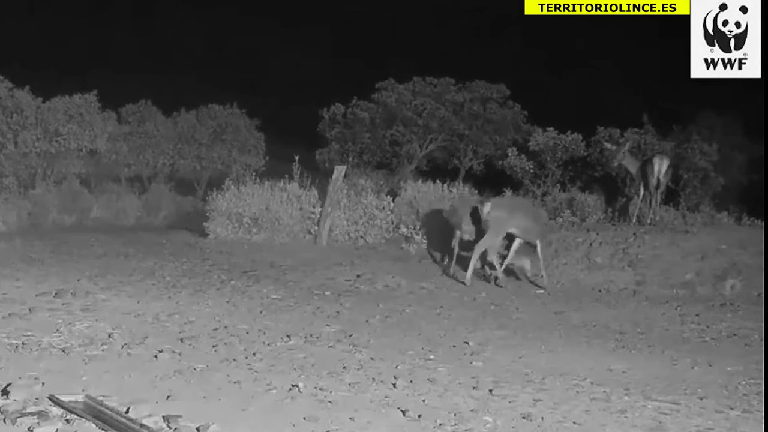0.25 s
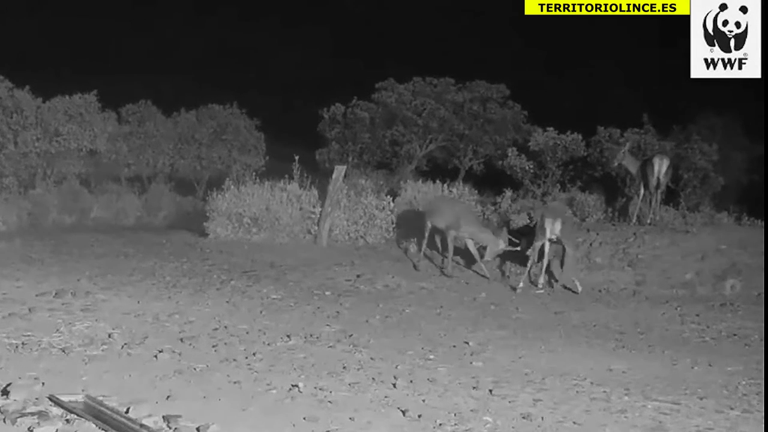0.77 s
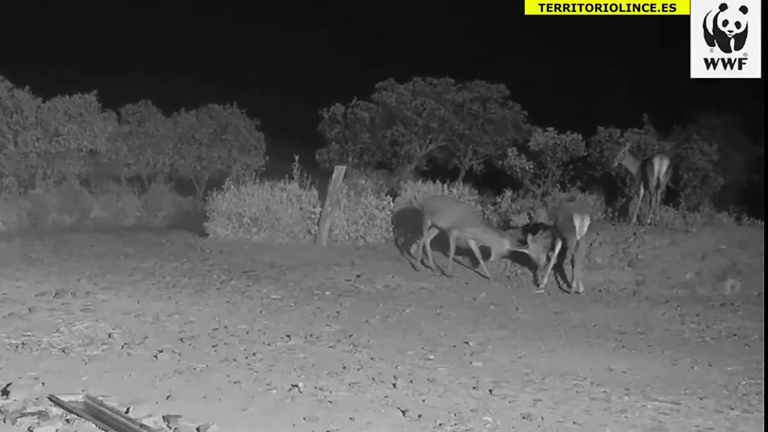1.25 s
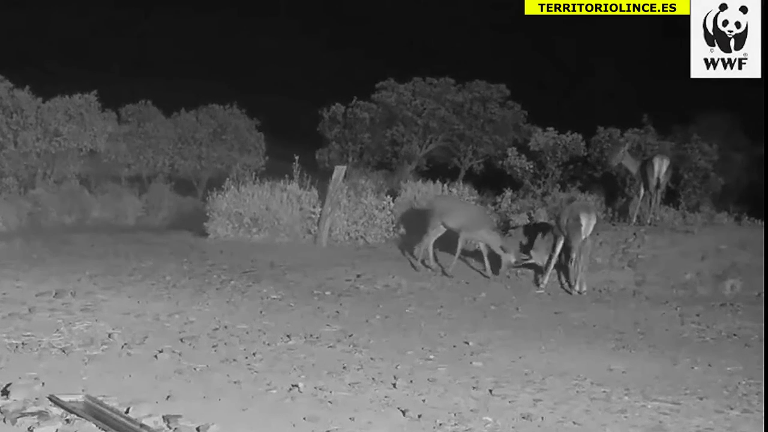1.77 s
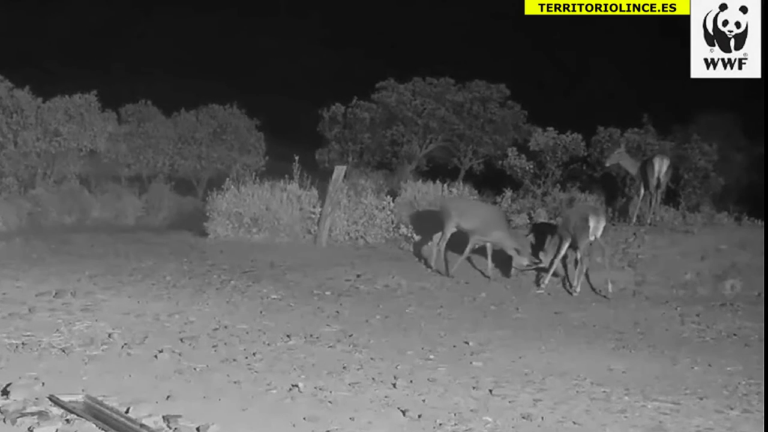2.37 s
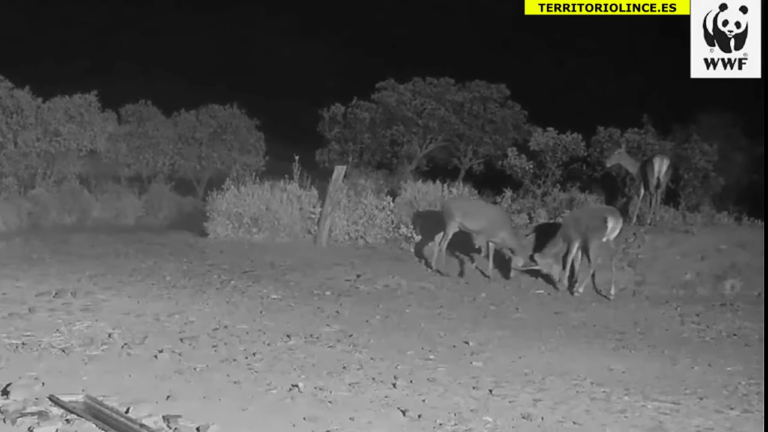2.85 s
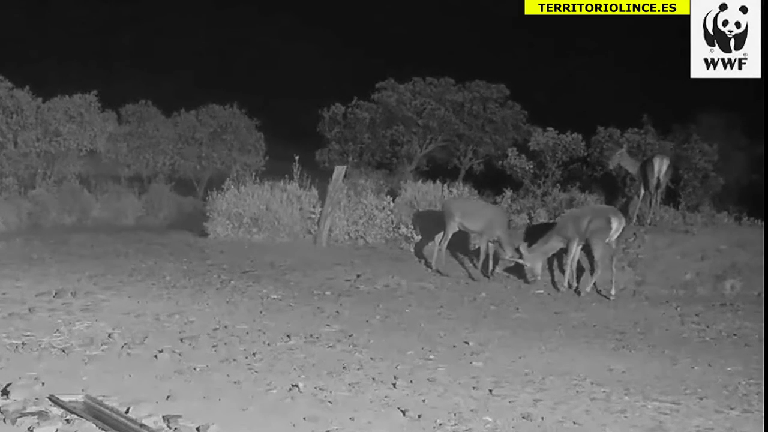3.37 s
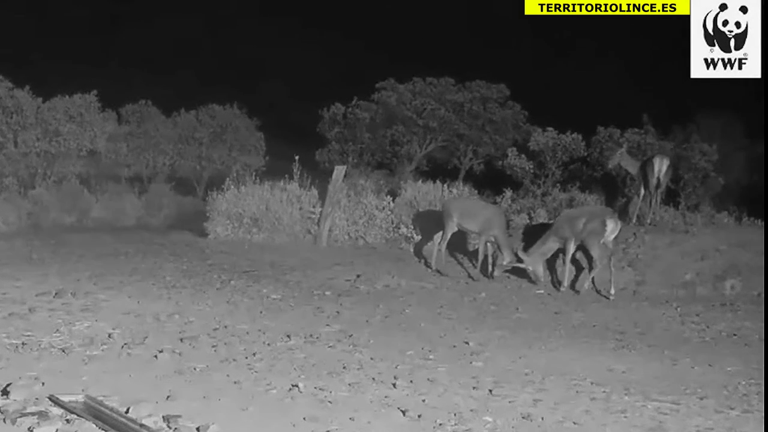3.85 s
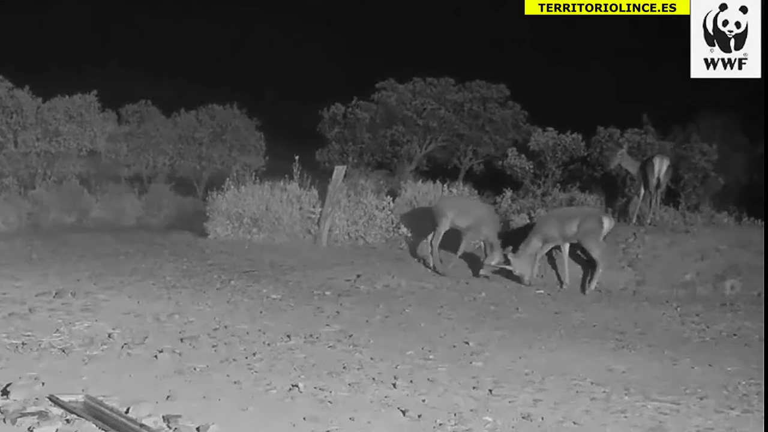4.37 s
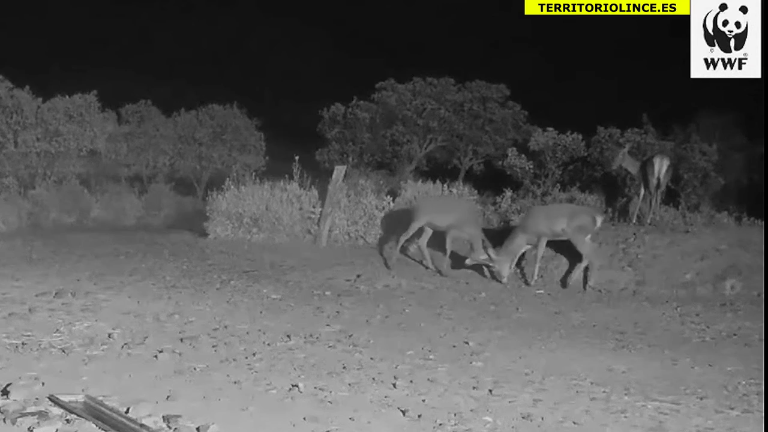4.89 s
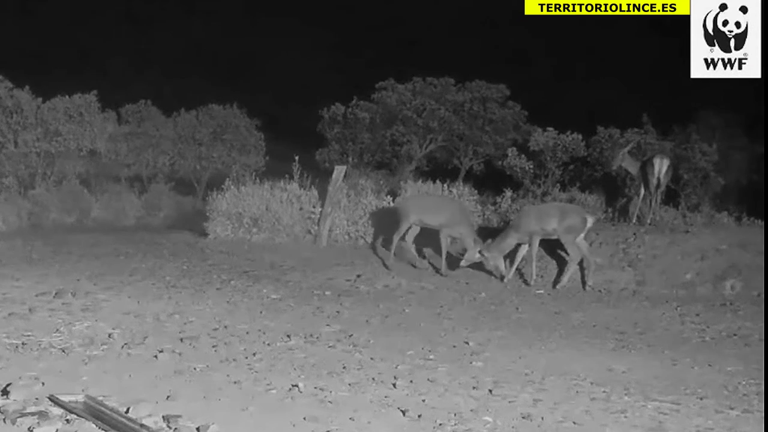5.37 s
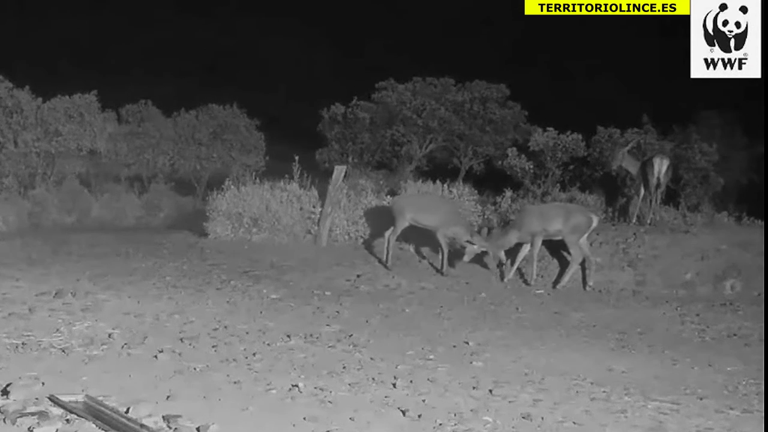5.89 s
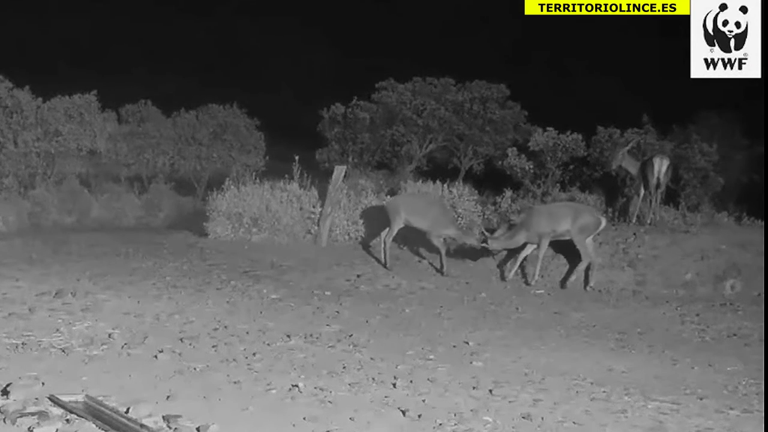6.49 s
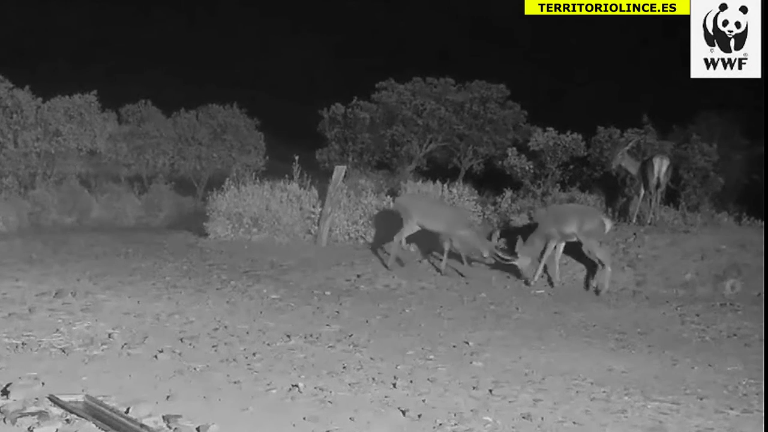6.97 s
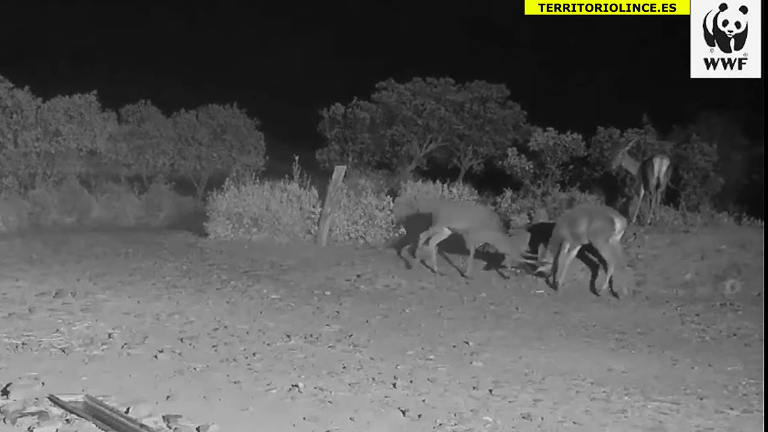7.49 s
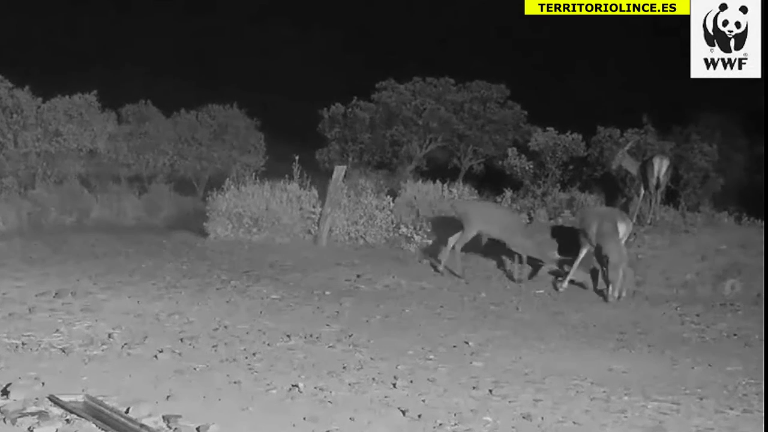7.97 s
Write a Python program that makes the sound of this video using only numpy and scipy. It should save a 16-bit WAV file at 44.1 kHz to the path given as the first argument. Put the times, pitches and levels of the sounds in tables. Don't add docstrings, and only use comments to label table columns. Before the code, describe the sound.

Two deer spar on bare stony ground at night. A quick flurry of dry antler clicks opens, with soft hoof thuds and scuffs, then a quiet gap of mostly hiss. Clacks return after three and four seconds, a duller knocking clash follows near five, and the densest, brightest burst comes after six, ending in rattling ticks and skidding hooves. Distant outdoor microphone, steady hiss, dull top end.

```python
import sys
import numpy as np
from scipy import signal
from scipy.fft import rfft, irfft
from scipy.io import wavfile

SR = 44100
rng = np.random.default_rng(int(sys.argv[2]) if len(sys.argv) > 2 else 0)


def generate_wav(sig):
    pcm = np.round(np.clip(np.atleast_2d(sig).T, -1, 1) * 32767).astype(np.int16)
    wavfile.write(sys.argv[1], SR, pcm)


def ratio(d):
    e = np.asarray(d, float) / 20
    return 10 ** e


N = 363384

# (time [s], peak [dB], ring [Hz], upper modes [dB])
TINES = [(.0787, -23, 1850, 0), (.317, -16, 1720, -12), (.3226, -23, 1680, -9), (.365, -19, 1950, 1),
         (.3685, -26, 1850, 0), (.5022, -20, 3360, -14), (.5178, -23, 2580, -8), (.5212, -23, 1850, -2),
         (.5259, -25, 3200, 0), (.5308, -20, 2410, 0), (.6042, -18, 2000, 2), (.6221, -28, 2800, -16),
         (3.0447, -27, 1340, -6), (4.0531, -23, 1850, 0), (4.8327, -26, 1040, -16),
         (4.8385, -23, 1040, -16), (4.8402, -25, 1040, -16), (6.29, -29, 2370, -4),
         (6.4192, -18, 3490, -13), (6.4261, -17, 3360, -13), (6.456, -27, 1720, -16),
         (6.4872, -24, 3490, -8), (7.33, -28, 1420, -2), (7.3373, -28, 1510, -11), (7.4604, -27, 2500, -1),
         (7.7006, -26, 2580, -13), (8.1548, -22, 1530, -2), (8.16, -28, 3000, 0)]
# (time [s], peak [dB], ring [Hz], lower mode [dB])
TIPS = [(.0816, -23, 3750, -1), (.3106, -21, 4260, -1), (.3126, -20, 4780, -5), (.4996, -19, 4870, 0),
        (.5285, -21, 4870, 0), (.6869, -20, 3920, -16), (.9935, -21, 4150, -3), (4.044, -21, 4440, 0),
        (4.2181, -26, 4300, -4), (4.5451, -18, 3960, -4), (4.5471, -18, 4200, -7), (4.9963, -23, 4130, -16),
        (6.4021, -25, 4130, -8), (6.4708, -21, 5210, -3), (6.5231, -18, 4260, -6), (6.5322, -17, 4300, -14),
        (6.823, -25, 6800, -1), (6.9461, -15, 4300, -9), (6.9471, -10, 5560, -5), (6.9522, -15, 4950, 0),
        (7.1439, -24, 4570, -8), (7.2866, -23, 3800, -1), (7.4165, -27, 6800, 0), (7.9068, -27, 6800, -16),
        (8.0259, -26, 6460, 0), (8.0712, -19, 6460, -2), (8.1486, -26, 3750, -9), (8.1563, -22, 6500, -2),
        (8.158, -22, 4700, -5), (8.2153, -27, 6240, 0)]
# (time [s], ticks [count], peak [dB], ring [Hz])
RATTLES = [(.5345, 2, -24, 5400), (.6905, 2, -29, 6000), (4.018, 1, -27, 4000), (4.0479, 1, -23, 4000),
           (4.0567, 1, -27, 7000), (4.246, 1, -30, 7000), (4.517, 1, -28, 6100), (7.382, 1, -29, 6600),
           (5.43, 2, -33, 1500), (5.4426, 1, -30, 5800), (6.4075, 1, -27, 5500), (6.4448, 1, -29, 6300),
           (6.4624, 2, -24, 4600), (6.5093, 1, -28, 5800), (7.704, 1, -29, 6200), (7.8924, 1, -27, 3800),
           (7.9706, 1, -24, 4900), (7.9799, 4, -22, 4950), (7.9967, 2, -24, 4900)]
# (time [s], peak [dB], ring [Hz], t60 [s])
KNOCKS = [
    (1.141, -32, 1150, .01),
    (4.824, -29, 1100, .015),
    (5.105, -31, 1000, .02),
    (5.126, -31, 1050, .02),
    (5.146, -32, 1100, .015),
    (5.431, -30, 1050, .012),
    (5.439, -29, 1150, .012),
    (6.385, -29, 1050, .015),
    (6.43, -28, 1100, .015),
    (7.134, -31, 1300, .012),
]
# (time [s], peak [dB], pitch [Hz])
THUDS = [(.08, -32, 300), (.316, -32, 340), (.463, -29, 460), (.5, -25, 350), (.692, -28, 360),
         (.992, -28, 440), (1.147, -30, 320), (3.048, -32, 280), (4.149, -31, 290), (4.517, -27, 260),
         (4.823, -19, 300), (4.841, -23, 410), (4.878, -25, 360), (4.984, -27, 360), (5.127, -29, 380),
         (5.147, -29, 330), (5.429, -21, 260), (5.437, -20, 260), (6.315, -23, 310), (6.35, -24, 420),
         (6.384, -19, 210), (6.404, -23, 450), (6.426, -19, 430), (6.448, -23, 430), (6.466, -28, 520),
         (6.946, -21, 220), (7.218, -29, 430), (7.918, -26, 360), (7.974, -27, 440), (8.06, -27, 230)]
# (time [s], pushes [count], peak [dB], pitch [Hz])
SKIDS = [
    (4.851, 2, -29, 280),
    (6.332, 1, -29, 250),
    (6.36, 2, -26, 320),
    (6.938, 1, -27, 290),
    (6.953, 1, -28, 370),
    (7.128, 5, -29, 390),
    (7.997, 5, -28, 300),
    (8.068, 5, -28, 260),
    (8.129, 5, -26, 330),
]
# (strongest time [s], fade time [s], gravel [dB], soil [dB])
DRAGS = [(.09, .05, -49, -52), (.33, .1, -42.5, -38), (.505, 0.032, -38, -29), (.538, 0.053, -38.5, -39),
         (.612, 0.045, -46, -37), (.692, 0.028, -35.5, -28.5), (1.14, 0.11, -48, -38),
         (3.052, .08, -48, -35.5), (3.4, 0.11, -58, -37), (4.042, .07, -43, -41), (4.15, .07, -47, -54),
         (4.56, 0.027, -46, -30.5), (4.828, .08, -45, -28.5), (5.14, 0.044, -43, -34),
         (5.222, 0.036, -43, -32), (5.436, .05, -45, -30), (6.34, .06, -50, -41), (6.39, 0.12, -40.5, -28),
         (6.51, 0.054, -38, -36), (6.95, 0.025, -35.5, -38), (7.15, 0.069, -43, -35),
         (7.34, 0.073, -41.5, -37.5), (7.705, 0.015, -36, -28), (7.914, 0.046, -43, -35),
         (7.992, 0.076, -35.5, -30), (8.1, .06, -55, -44), (8.162, 0.059, -38.5, -33),
         (8.23, 0.067, -42, -38)]
# (start [s], end [s], gravel [dB], soil [dB])
SHOVES = [
    (0, 1.4, -51, -46.5),
    (3.9, 5.705, -56.5, -49),
    (6.2, 8.24, -55.5, -46),
]
# (frequency [Hz], level [dB])
COLOUR = [(40, -49), (105, -23.5), (175, -1), (420, -2), (560, -9), (780, -18.5), (1050, -9.5), (1450, -7),
          (1950, -10.5), (3000, -5), (4300, -9), (6400, -18), (7700, -28.5), (8900, -28.5)]
# (time [s], length [s], lost above [Hz])
DROPOUTS = [
    (.356, .01, 6500),
    (.611, .011, 5200),
    (2.164, .013, 7800),
    (2.837, .037, 7200),
    (4.185, .014, 7200),
    (4.531, .01, 8200),
    (5.975, .008, 7000),
    (6.161, .01, 7000),
    (7.436, .011, 6600),
    (8.179, .013, 7300),
]

TICK_GAP_S, TICK_SPREAD_DB, TICK_DETUNE = .0037, 1.5, .03
SKID_GAP_S, SKID_SPREAD_DB, SKID_DETUNE = .0105, 4, .24
BONE_T60_AT_1KHZ_S, BONE_SHORTEST_S, BONE_DAMPING = .013, .0043, 1.5
TINE_BELOW_DB, TIP_ABOVE_DB, RATTLE_BELOW_DB = -4, -13.5, -7
THUD_T60_S = .029
DRAG_RISE, DRAG_FADE_DB = .8, 13.5
HISS_DB, CONVERTER_DB = -37.5, -79.5


def antlers():
    ticks = run_of(RATTLES, TICK_GAP_S, TICK_SPREAD_DB, TICK_DETUNE)
    touches = [bone(s, db, hz, TINE_BELOW_DB, above_db) for s, db, hz, above_db in TINES]
    touches += [bone(*row, TIP_ABOVE_DB) for row in TIPS]
    touches += [bone(*row, RATTLE_BELOW_DB, TIP_ABOVE_DB) for row in ticks]
    clacks = blows(touches, rise_cycles=.5, rough=.4, size=1024)
    t = np.arange(2600) / SR
    scatter = rng.standard_normal(len(t)) * ratio(-60 * t / .03) * (t > .0015)
    scatter /= np.linalg.norm(scatter)
    heard = clacks + ratio(-10) * signal.fftconvolve(clacks, scatter)[:N]
    return signal.sosfilt(signal.butter(4, 920, "high", fs=SR, output="sos"), heard)


def bone(s, db, hz, below_db, above_db):
    t60_s = max(BONE_SHORTEST_S, BONE_T60_AT_1KHZ_S * (hz / 1000) ** -BONE_DAMPING)
    return s, db, hz, t60_s, below_db, above_db


def beams():
    return blows([(*row, -8, -8) for row in KNOCKS], rise_cycles=.5, rough=.7, size=1024)


def hooves():
    steps = [*THUDS, *run_of(SKIDS, SKID_GAP_S, SKID_SPREAD_DB, SKID_DETUNE)]
    rows = [(*row, THUD_T60_S, -12, -14) for row in steps]
    pushes = blows(rows, rise_cycles=.15, rough=.29, size=4096)
    return band(pushes, 150, 640, order=4)


def run_of(rows, gap_s, spread_db, detune):
    touches = [(s + k * gap_s, db, hz, k > 0) for s, count, db, hz in rows for k in range(count)]
    chance = np.tanh(rng.standard_normal((len(touches), 3)))
    return [(s + later * gap_s * a / 3, db + spread_db * b, hz * (1 + detune * c))
            for (s, db, hz, later), (a, b, c) in zip(touches, chance)]


def blows(rows, rise_cycles, rough, size):
    out = np.zeros(N + size)
    t = np.arange(size) / SR
    chances = rng.standard_normal((len(rows), size))
    for (s, db, hz, t60_s, below_db, above_db), chance in zip(rows, chances):
        shape = (1 - np.exp(-t * hz / rise_cycles)) ** 2 * ratio(-60 * t / t60_s)
        modes_hz = hz * np.array([[.7], [1.35], [1.85]]) * (1 + .06 * np.tanh(chance[:3, None]))
        strengths = ratio(np.array([[below_db], [above_db], [above_db - 2]])) * (modes_hz < 7500)
        partners = (strengths * np.sin(2 * np.pi * modes_hz * t)).sum(axis=0)
        skin = rough * rms_one(band(chance, .7 * hz, 1.2 * hz))
        ring = shape * (np.sin(2 * np.pi * hz * t) + partners + skin)
        polarity = np.sign(chance[3])
        at = round(s * SR)
        out[at:at + size] += ratio(db) * polarity * ring / np.max(np.abs(ring))
    return out[:N]


def scuffs():
    gravel, soil = dragging()
    sizes = ratio(3.2 * np.minimum(rng.exponential(1, N), 4)) * rng.choice([-1, 1], N)
    grains_per_s = 3000 * ratio(3 * drift(40))
    grains = coloured(sizes * (rng.random(N) < grains_per_s / SR))
    grit = ratio(.5) * rms_one(band(grains, 3400, 8900))
    pebbles = ratio(-1.5) * rms_one(band(grains, 870, 2820, order=3))
    rumble_db = -7.5 + 1.9 * drift(25)
    rumble = ratio(rumble_db) * rms_one(band(rng.standard_normal(N), 196, 512, order=4))
    return gravel * (grit + pebbles) + soil * rumble


def dragging():
    t = np.arange(N) / SR
    power = np.zeros((2, N))
    for s, fade_s, gravel_db, soil_db in DRAGS:
        away = np.maximum((s - t) / DRAG_RISE, t - s) / fade_s
        power += ratio(np.array([[gravel_db], [soil_db]]) - DRAG_FADE_DB * away) ** 2
    for start, end, gravel_db, soil_db in SHOVES:
        ramp = np.clip(np.minimum(t - start, end - t) / .12, 0, 1)
        power += ratio(np.array([[gravel_db], [soil_db]])) ** 2 * ramp
    return np.sqrt(power)


def hiss():
    noise = coloured(rng.standard_normal(N + 4096))[4096:]
    breathing_db = .3 * drift(3)
    return ratio(HISS_DB + breathing_db) * rms_one(noise)


def coloured(x, size=4096):
    hz, db = np.transpose(COLOUR)
    grid_hz = np.maximum(np.arange(size // 2 + 1), 1) * SR / size
    response_db = np.interp(np.log(grid_hz), np.log(hz), db)
    cepstrum = irfft(np.log(ratio(response_db)))
    cepstrum[1:size // 2] *= 2
    cepstrum[size // 2 + 1:] = 0
    kernel = irfft(np.exp(rfft(cepstrum)))
    return signal.fftconvolve(x, kernel / np.linalg.norm(kernel))[:len(x)]


def drift(rate_hz):
    r = np.exp(-80 * np.pi * rate_hz / SR)
    slow = signal.lfilter([1], [1, -2 * r, r * r], rng.standard_normal(N // 40 + 2002))[2000:]
    return np.interp(np.arange(N) / 40, np.arange(len(slow)), rms_one(slow))


def band(x, low_hz, high_hz, order=2):
    return signal.sosfilt(signal.butter(order, [low_hz, high_hz], "band", fs=SR, output="sos"), x)


def rms_one(x):
    return x / np.sqrt(np.mean(x ** 2) + 1e-20)


def scene():
    return np.tile(antlers() + beams() + hooves() + scuffs() + hiss(), (2, 1))


def treble_dropouts(x):
    out = x.copy()
    pad = 400
    for s, length_s, edge_hz in DROPOUTS:
        part = slice(round(s * SR) - pad, round((s + length_s) * SR) + pad)
        top = signal.sosfiltfilt(signal.butter(8, edge_hz, "high", fs=SR, output="sos"), x[:, part])
        t = np.arange(top.shape[1])
        fade = np.clip((np.minimum(t, t[::-1]) - pad / 2) / (pad / 2), 0, 1)
        out[:, part] -= top * fade
    return out


def roll_off(x):
    return signal.sosfilt(signal.butter(12, 13950, fs=SR, output="sos"), x)


def record(dry):
    cut = signal.sosfilt(signal.cheby2(10, 50, 9000, fs=SR, output="sos"), dry)
    converter = ratio(CONVERTER_DB) * rms_one(band(rng.standard_normal(N), 8100, 13900, order=8))
    mix = treble_dropouts(cut + converter)
    return roll_off(mix)


dry = scene()
out = record(dry)
generate_wav(out)
```